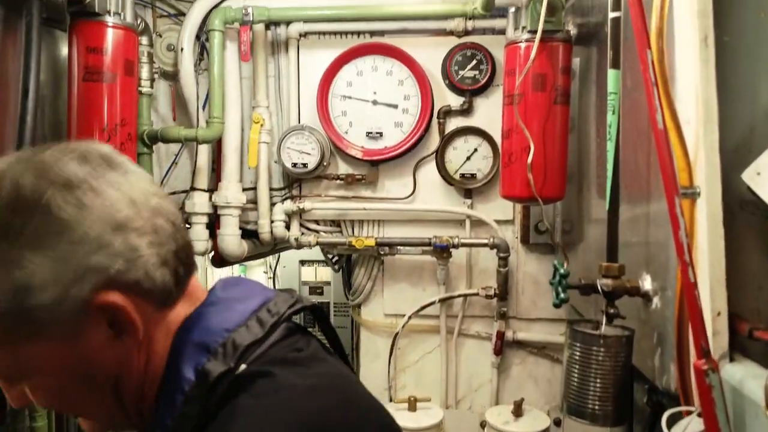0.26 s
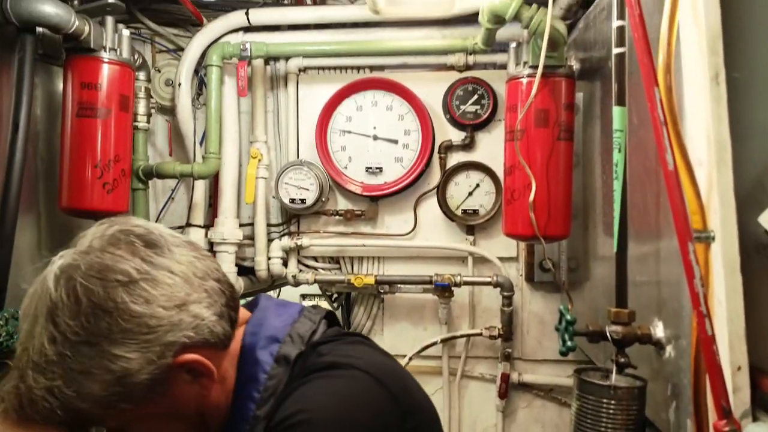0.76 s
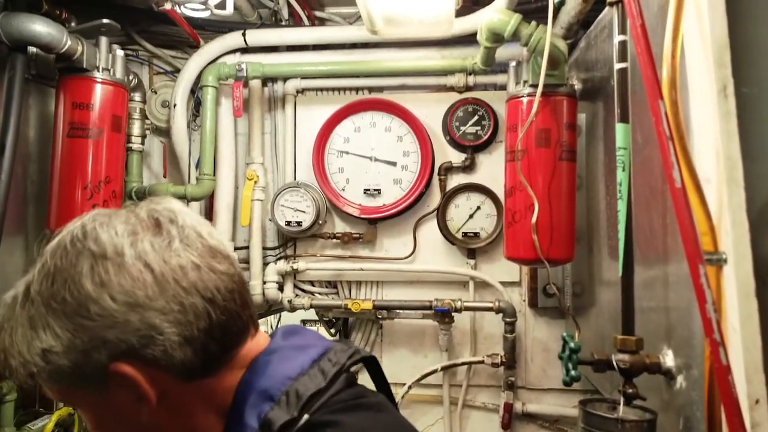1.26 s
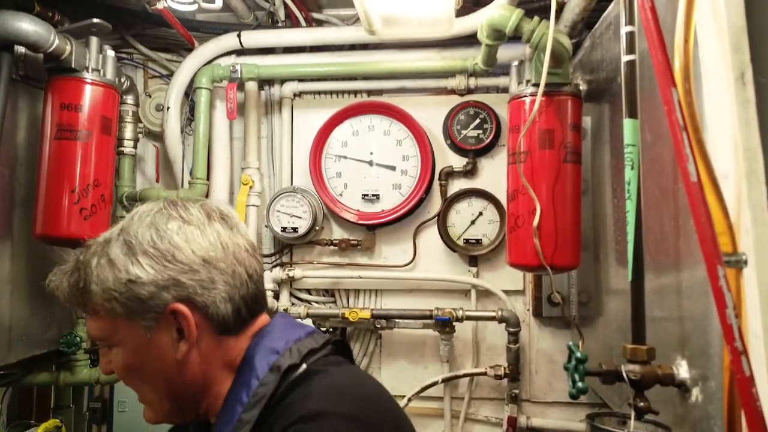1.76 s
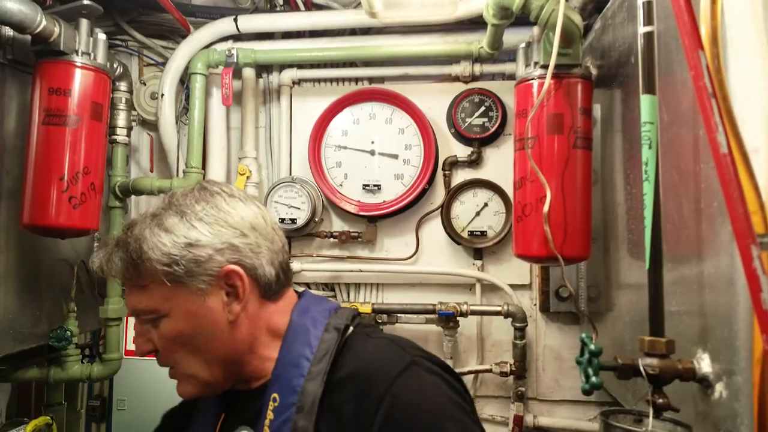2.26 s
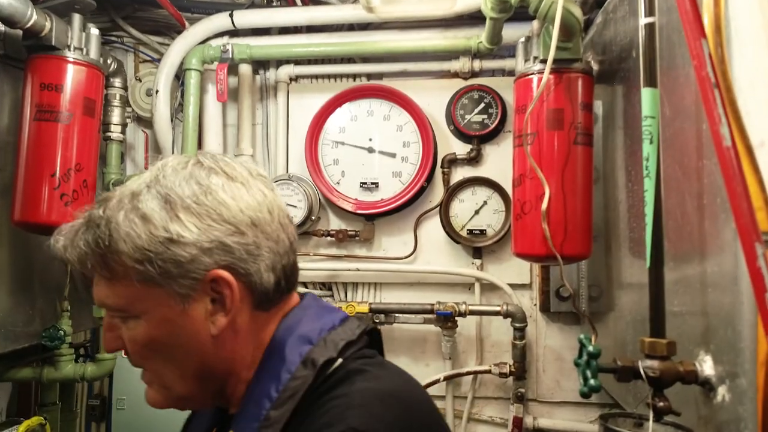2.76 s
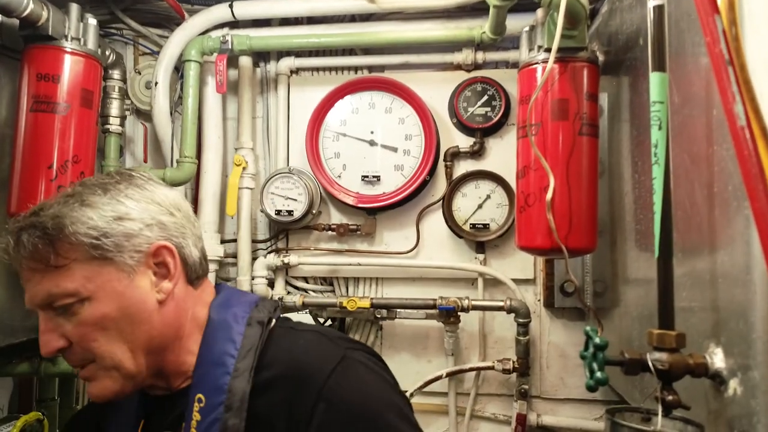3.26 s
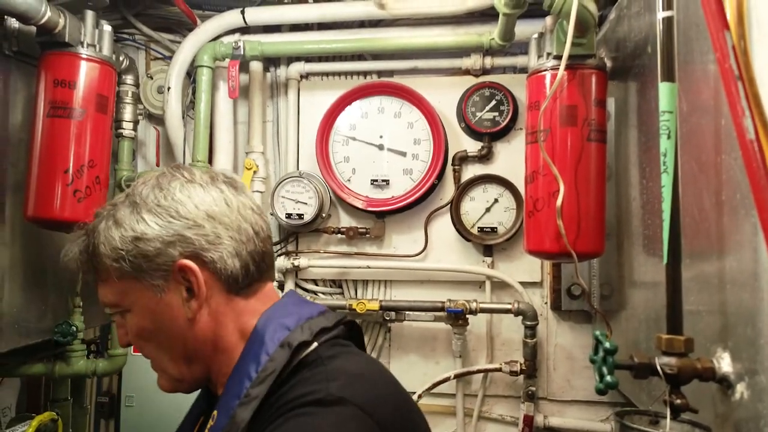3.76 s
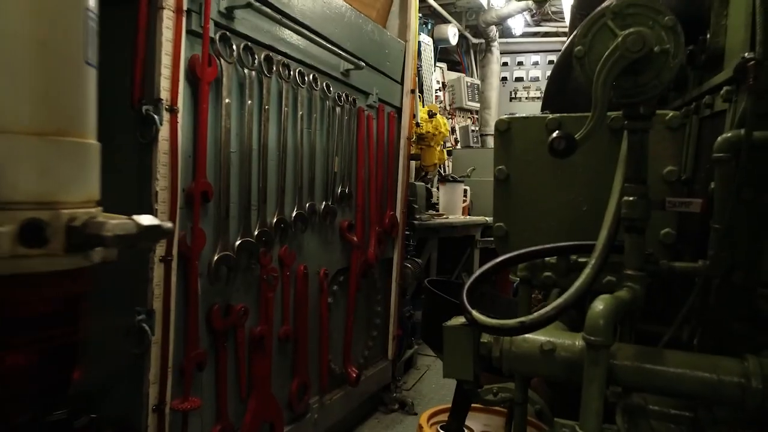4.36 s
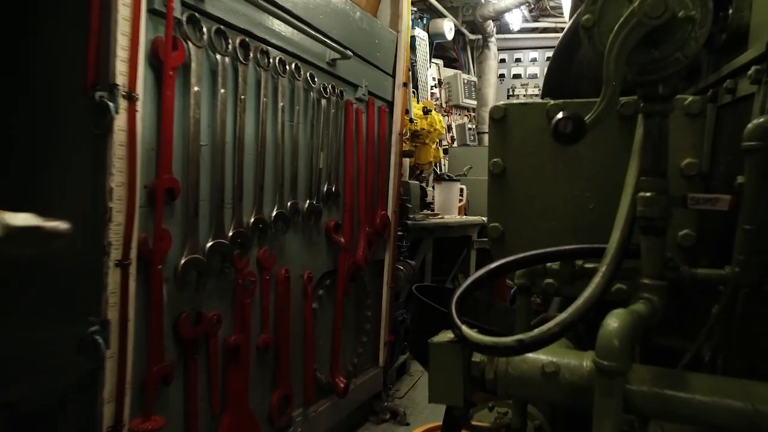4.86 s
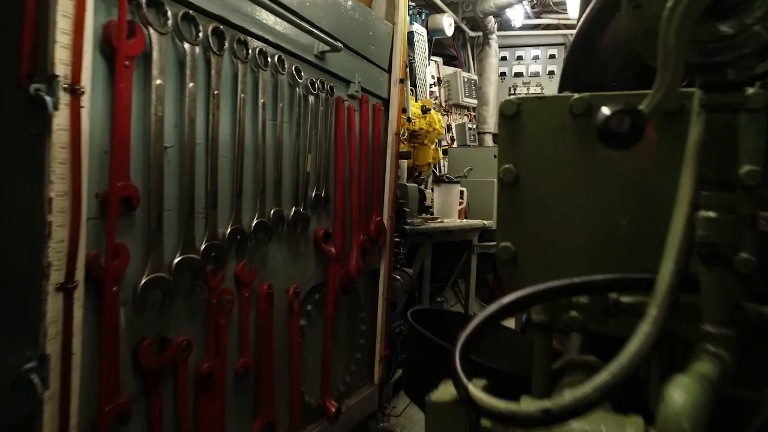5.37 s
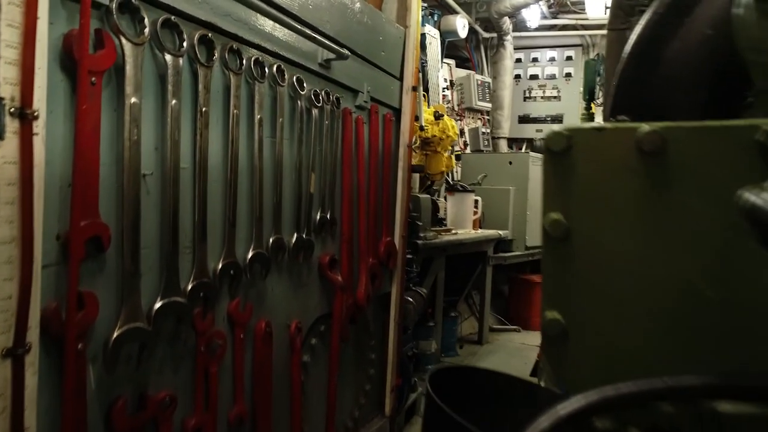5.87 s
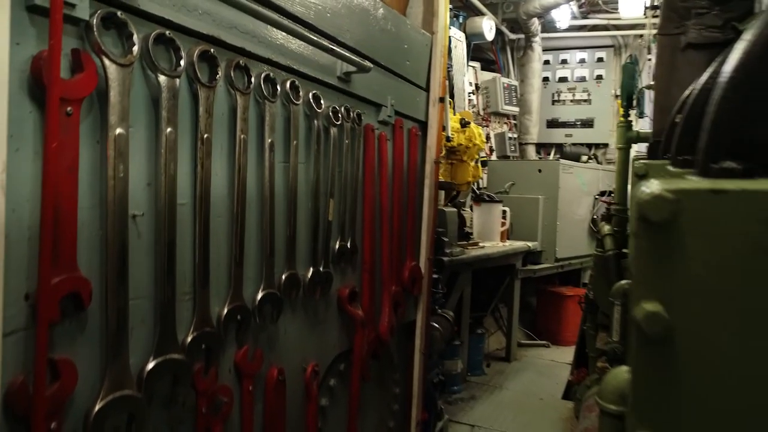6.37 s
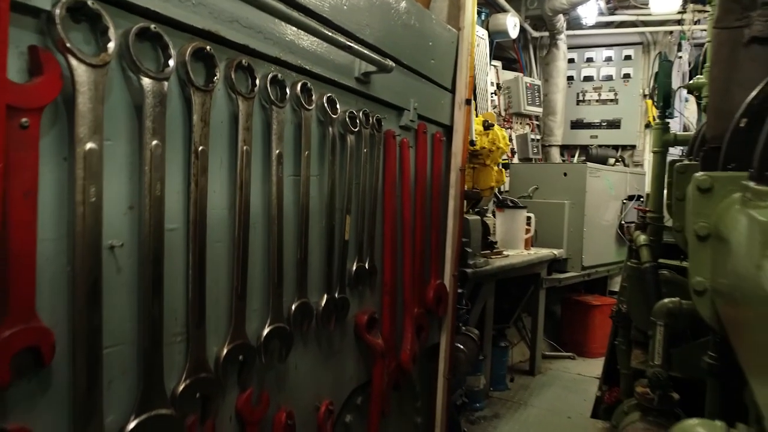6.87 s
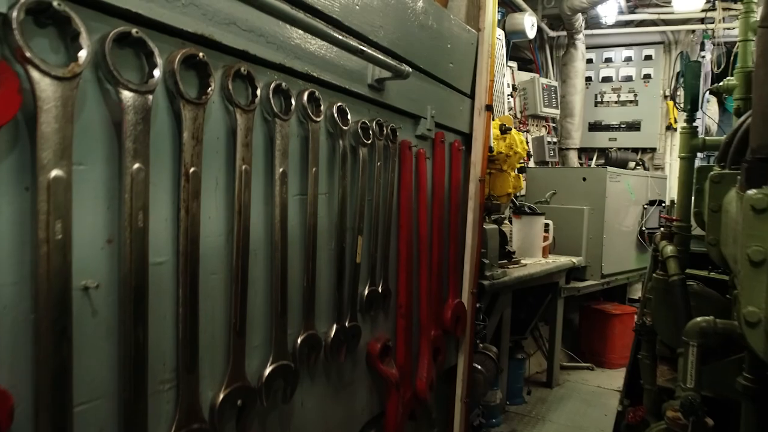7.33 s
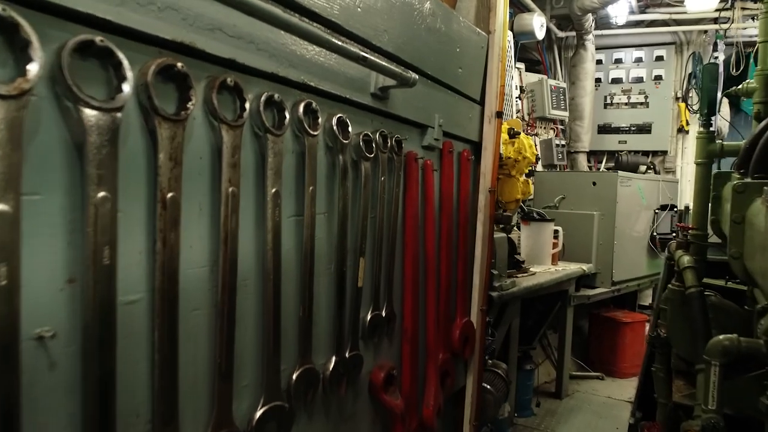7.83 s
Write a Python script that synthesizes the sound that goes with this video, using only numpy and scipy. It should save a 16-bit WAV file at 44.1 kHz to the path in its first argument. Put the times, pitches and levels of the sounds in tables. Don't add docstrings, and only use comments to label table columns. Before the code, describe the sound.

In a boat's steel engine room, a diesel hums steadily at a deep pitch, with pump hum, hull rumble and rushing valve clatter. Around four seconds it blends into a louder spot where two engines beat slowly, a gear whine rides above and a loose tappet rattles. Sparse ticks, knocks and shoe scuffs come through. Mono camera microphone, slightly dulled treble.

```python
import sys
import numpy as np
from scipy import signal
from scipy.fft import rfft, irfft
from scipy.io import wavfile
from scipy.ndimage import uniform_filter1d

SR = 44100
rng = np.random.default_rng(int(sys.argv[2]) if len(sys.argv) > 2 else 0)


def how_loud(loudness_db):
    steps = np.asarray(loudness_db, float) / 20
    return 10 ** steps


def wav_record(signal):
    frames = np.transpose(np.atleast_2d(signal))
    bounded = np.clip(frames, -1, 1)
    quanta = np.round(bounded * 32767).astype(np.int16)
    wavfile.write(sys.argv[1], SR, quanta)


N = 357210
T = np.arange(N) / SR


def curves(table):
    s, *columns = np.transpose(table)
    return [np.interp(T, s, c) for c in columns]


def walk(rate):
    k = int(SR / rate)
    knots = rng.standard_normal(N // 1000 + 2)
    joined = np.interp(np.arange(N) / k, np.arange(len(knots)), knots)
    return 1.43 * uniform_filter1d(joined, k)


def shaped(x, gain):
    return irfft(rfft(x) * gain(np.fft.rfftfreq(len(x), 1 / SR)), len(x))


def colour(points):
    hz, db = np.transpose(points)
    return lambda f: how_loud(np.interp(np.log(f + 1), np.log(hz), db, left=-90))


def bumps(modes):
    return lambda f: how_loud(sum(db / (1 + (2 * (f - hz) / width_hz) ** 2) for hz, width_hz, db in modes))


def unit(x):
    return x / np.std(x)


def turns(speed, start):
    return start + np.cumsum(curves(speed)[0]) / SR


def throb(angle, half, full):
    return 1 + half * np.cos(4 * np.pi * angle) + full * np.cos(8 * np.pi * angle)


def tones(angle, orders, scatter, sway_db, ring=(0, 0), count=3):
    order, db = np.transpose(orders)
    order = np.round(order).astype(int)
    phase = scatter * (order - 4) * rng.standard_normal(len(order))
    delay_turns, phase_cycles = ring
    phase = phase + 2 * np.pi * (phase_cycles - delay_turns * order) * (order > 10)
    lines = how_loud(db) * np.exp(1j * phase) * 4096 * np.sqrt(2)
    out = 0
    for k in range(count):
        bins = np.zeros(4097, complex)
        bins[order[k::count]] = lines[k::count]
        one_turn = np.resize(irfft(bins), 8193)
        slipped = angle + 0.00045 * walk(3.89)
        wave = np.interp(slipped % 1, np.arange(8193) / 8192, one_turn)
        out = out + how_loud(sway_db * walk(7)) * wave
    return out


def noise(points, swell_db, flicker_db):
    white = rfft(rng.standard_normal(N))
    swell = walk(7)
    f = np.fft.rfftfreq(N, 1 / SR)
    first, last = np.round(np.log2([points[0][0], 2 * points[-1][0]]))
    out = 0
    for octave in np.arange(first, last):
        share = np.sqrt(np.clip(1 - abs(np.log2(f + 1) - octave), 0, 1))
        level = how_loud(swell_db * swell + flicker_db * walk(12))
        out = out + level * irfft(white * share, N)
    return unit(shaped(out, colour(points)))


def wall_spot():
    # time in seconds, turns per second.
    speed = [(0, 15.468), (4.1, 15.487)]
    # multiple of the shaft speed, rms level in dB.
    orders = [(2, -52), (3, -43), (4, -24), (5, -51), (7, -48), (8, -41), (10, -56), (12, -50), (13, -56),
              (14, -51), (16, -45), (17, -52), (18, -59), (19, -58), (20, -42), (21, -48), (22, -58),
              (24, -48), (25, -59), (28, -60), (29, -56), (31, -59), (33, -59), (46, -58), (48, -62),
              (60, -63), (76, -60), (116, -63), (121, -64), (129, -63)]
    # time
    # in seconds, level in dB.
    hum_level = [(0, -24.5), (.2, -29), (.6, -25), (1.05, -23.5), (1.6, -26), (2.0, -24.5), (2.8, -23),
                 (3.15, -27), (3.4, -28.5), (3.65, -25), (3.85, -20.5), (3.97, -34)]
    angle = turns(speed, -.0472)
    engine = tones(angle, orders, scatter=.025, sway_db=.8, ring=(.363, -.29))
    hum = shaped(engine, lambda f: abs(f - 62) < 7)
    engine = hum * how_loud(curves(hum_level)[0] + 25.0) + engine - hum
    return engine + wall_pump() + wall_rumble(angle) + wall_clatter(angle, speed, orders)


def wall_pump():
    # frequency in Hz, rms level in dB.
    pump_tones = [(20.4, -55), (55.5, -42.5), (86.5, -49), (179.2, -56), (215.6, -52)]
    return sum(-how_loud(db) * np.sqrt(2) * np.cos(2 * np.pi * hz * T) for hz, db in pump_tones)


def wall_rumble(angle):
    # frequency in Hz, level in dB.
    points = [(12, -14), (20, 0), (38, -23), (55, 6.5), (75, -8), (95, -6), (120, -9.5), (165, -10.5),
              (210, -11), (310, -7), (390, -17.5), (500, -33), (700, -33)]
    return how_loud(-38.5) * noise(points, 0.25, 0.17) * throb(angle, 0.071, 0.14)


def wall_clatter(angle, speed, orders):
    # frequency in Hz, level in dB.
    points = [(240, -64), (400, -2), (695, -2), (785, -8.5), (874, -3.5), (1260, -9.5), (1940, -9),
              (4370, -16), (4860, -19.5), (9550, -21.5), (10500, -24.5), (13400, -23.5), (15600, -23)]
    level_db, thins_db_per_s = -39, -0.25
    valves = repeating(angle, speed, orders, points)
    air = noise(points, .3, .4) * throb(angle, .03, .025)
    return (how_loud(1.23) * air + how_loud(-9) * valves) * how_loud(level_db + thins_db_per_s * T)


def walk_spot():
    # time in seconds, turns per second.
    speed = [(3.2, 13.688), (4.2, 13.7075), (4.8, 13.6952), (5.4, 13.7066), (6.0, 13.6907), (6.6, 13.6729),
             (7.2, 13.7009), (7.7, 13.6685), (8.1, 13.7292)]
    twin_speed = [(0, 13.075), (8.1, 13.075)]
    # multiple of the shaft speed, rms level in dB.
    orders = [(2, -45), (4, -20), (8, -38), (9, -55), (10, -61), (12, -51), (14, -51), (16, -45), (20, -54),
              (21, -60), (22, -57), (24, -50), (28, -58), (30, -60), (32, -66), (34, -68), (36, -66),
              (38, -58), (40, -49), (50, -61), (51, -60), (52, -58), (55, -58), (56, -65), (58, -60),
              (59, -65), (60, -59), (62, -66)]
    twin_orders = [(2, -45), (4, -36), (5, -41), (7, -46), (8, -51), (9, -58), (11, -58), (16, -58),
                   (18, -63)]
    gear_orders = [(64, -62), (67, -58), (68, -55), (69, -58), (72, -56), (73, -58), (76, -54), (78, -61),
                   (80, -60), (86, -53), (90, -53), (91, -58), (92, -57), (93, -61), (99, -50), (102, -58),
                   (103, -53), (104, -49), (107, -53), (108, -51), (113, -56), (114, -54), (119, -60),
                   (120, -59), (143, -59), (145, -59), (147, -61), (155, -62), (186, -67), (187, -62)]
    # time in seconds, level in dB.
    hum_level = [(3.45, -15.5), (3.75, -21), (4.05, -20.5), (4.5, -20.5), (5.6, -22), (6.3, -21.5),
                 (7.1, -22.5), (8.1, -21)]
    entrance_db, entrance_s, settles_s = 1.5, 4.6, 0.27
    settling = np.exp(-np.clip(T - entrance_s, 0, None) / settles_s)
    clatter_db = -38 + entrance_db * settling

    angle = turns(speed, -.2807)
    engine = tones(angle, orders, scatter=.025, sway_db=.4, ring=(.85, .27))
    twin = tones(turns(twin_speed, .21), twin_orders, scatter=0.013, sway_db=-1.0)
    mesh = gear_orders + sidebands(gear_orders, orders)
    gears = tones(angle, mesh, scatter=1.5, sway_db=.8, count=5)
    engines = (engine + twin) * how_loud(curves(hum_level)[0] + 21.5)
    clatter = walk_clatter(angle, speed, orders + mesh) * how_loud(clatter_db)
    return engines + gears * how_loud(clatter_db + 39.0) + walk_rumble() + clatter


def sidebands(gear_orders, engine_orders):
    level_db, scatter_db = -8, 2.1
    order, db = np.transpose(gear_orders)
    taken = np.r_[order, np.transpose(engine_orders)[0]]
    beside = np.setdiff1d(np.r_[order - 1, order + 1], taken)
    nearest = abs(beside[:, None] - order).argmin(axis=1)
    return list(zip(beside, db[nearest] + level_db + scatter_db * rng.standard_normal(len(beside))))


def walk_clatter(angle, speed, named):
    # frequency in Hz, level in dB.
    points = [(240, -30), (400, -17), (466, -15), (543, -2.5), (605, -7), (958, -8.5), (1280, -6),
              (1430, -5), (2260, -8), (2560, -9), (3170, -14.5), (8980, -25), (10300, -29), (13600, -29.5),
              (15600, -28)]
    # frequency in Hz, width in Hz, height in dB.
    casing = [(970, 160, 7), (1690, 62, 5.5), (2040, 240, 2), (2220, 210, -4), (2510, 96, 3)]
    teeth = repeating(angle, speed, named, points)
    air = noise(points, .3, .35) * throb(angle, .02, .03)
    return shaped(how_loud(-1.5) * air + how_loud(-16) * teeth + how_loud(-13) * tappet(angle), bumps(casing))


def tappet(angle):
    centre_hz, width_hz, length_turns = 2050, 550, .09
    rattle = shaped(rng.standard_normal(N), lambda f: 1 / (1 + (2 * (f - centre_hz) / width_hz) ** 4))
    once_a_turn = np.exp(-.5 * ((angle % 1 - .5) / length_turns) ** 2)
    return unit(rattle * once_a_turn * how_loud(1.9 * walk(7.1)))


def repeating(angle, speed, named, points):
    every = np.setdiff1d(np.arange(30, 220), np.transpose(named)[0])
    line_hz = every * speed[1][1]
    line_db = 20 * np.log10(colour(points)(line_hz)) + 2.5 * rng.standard_normal(len(every))
    return unit(tones(angle, np.transpose([every, line_db]), scatter=1.5, sway_db=.8))


def walk_rumble():
    # frequency in Hz, level in dB.
    points = [(12, -26), (20, -9), (34, -19), (52, -0.5), (75, -5.5), (95, -9), (120, -13), (165, -26),
              (210, -20.5), (310, -13), (390, -22.5), (450, -37), (700, -53)]
    return how_loud(-40) * noise(points, 0.27, 1.0)


def knocks():
    # start in seconds, peak level in dB, pitch in Hz, time to
    # fall 60 dB in seconds.
    strikes = [(0.176, -32, 1006, 0.066), (.427, -24, 653, 0.091), (.428, -33, 1336, .1),
               (.43, -29, 727, .15), (0.466, -34, 1150, 0.11), (.487, -31, 850, .08),
               (1.234, -34, 10000, .05), (1.239, -40, 4700, .08), (5.628, -33, 544, 0.12),
               (5.636, -44, 5950, .15), (6.642, -26, 332, 0.055), (6.835, -32, 1800, 0.12),
               (6.84, -34, 610, 0.088), (6.841, -35, 702, 0.42), (6.844, -28, 1220, 0.084),
               (6.853, -32, 1510, 0.13), (6.863, -26, 1144, 0.063)]
    out, unsteady = np.zeros(N), .5 * walk(40)
    t = np.arange(SR // 2) / SR
    for s, db, hz, t60 in strikes:
        start = int(s * SR)
        ring = np.sin(2 * np.pi * hz * t + unsteady[start:][:len(t)])
        attack = 1 - np.exp(-t / 0.0017)
        out[start:][:len(t)] += how_loud(db) * attack * how_loud(-60 * t / t60) * ring
    return out


def scuffs():
    # start in seconds, rms level in dB, centre in Hz, time to fall 60 dB in seconds.
    rubs = [(.178, -41, 6300, .14), (.352, -39, 3000, 0.11), (0.428, -38.5, 1100, .35),
            (.936, -35, 2500, .07), (1.232, -33.5, 10500, .09), (1.236, -36, 4300, .11),
            (3.342, -35.5, 11500, .07), (3.343, -39.5, 5540, 0.15), (3.343, -29, 1880, 0.044),
            (3.345, -36, 800, 0.43), (5.632, -31.5, 1810, 0.33), (5.631, -37, 320, 0.49),
            (5.633, -40, 700, 0.21), (5.685, -35, 1300, 0.22), (6.643, -33, 450, .15),
            (6.823, -32, 2200, 0.25), (6.825, -46, 5500, .2), (6.84, -33, 1110, 0.19),
            (6.856, -38, 1400, 0.15)]
    width_share, rise_share = 1.07, 0.0073
    out = np.zeros(N)
    t = np.arange(SR // 2) / SR
    for s, db, hz, t60 in rubs:
        white = rng.standard_normal(len(t))
        burst = unit(shaped(white, lambda f: 1 / (1 + (2 * (f / hz - 1) / width_share) ** 2)))
        attack = 1 - np.exp(-t / (rise_share * t60))
        out[int(s * SR):][:len(t)] += how_loud(db) * attack * how_loud(-60 * t / t60) * burst
    return out


def scene():
    fade_start_s, fade_length_s = 3.268, 0.99
    turn = np.pi / 2 * np.clip((T - fade_start_s) / fade_length_s, 0, 1)
    spots = np.cos(turn) * wall_spot() + np.sin(turn) * walk_spot()
    return (spots + knocks() + scuffs())[None]


def housing(x):
    # frequency in Hz, width in Hz, depth in dB.
    hollows = [(3040, 560, -3), (4930, 390, -6), (7410, 820, -3.5), (10370, 340, -5), (14900, 900, -2.5)]
    return shaped(x, bumps(hollows))


def starve(x, above_hz=3500, share=0.073):
    f, _, z = signal.stft(x, SR, nperseg=1024)
    power = uniform_filter1d(uniform_filter1d(abs(z) ** 2, size=5, axis=0), size=2, axis=1)
    treble = (f > above_hz) & (f < 15700)
    power = power / np.median(power[treble], axis=0) ** .75
    faint = treble[:, None] & (power < np.quantile(power[treble], share))
    return signal.istft(np.where(faint, z * how_loud(-16), z), SR, nperseg=1024)[1][:N]


def roll_off(x):
    return signal.sosfilt(signal.butter(12, 15740, fs=SR, output="sos"), x)


def record(dry):
    mix = starve(housing(dry[0]))[None]
    return roll_off(mix)


dry = scene()
out = record(dry)
wav_record(out)
```